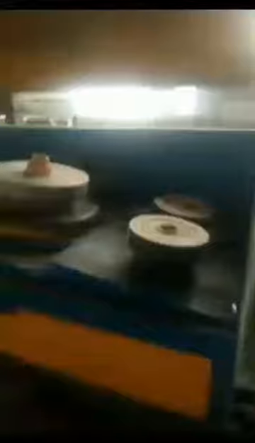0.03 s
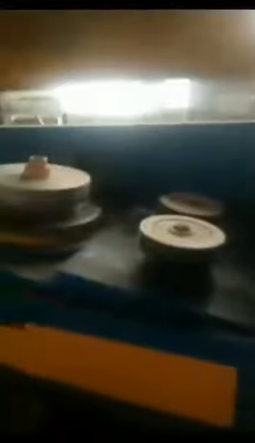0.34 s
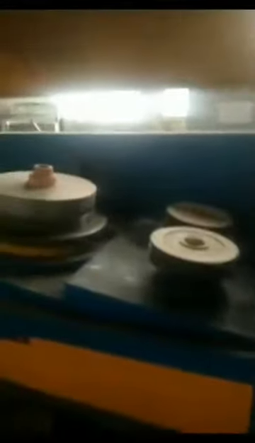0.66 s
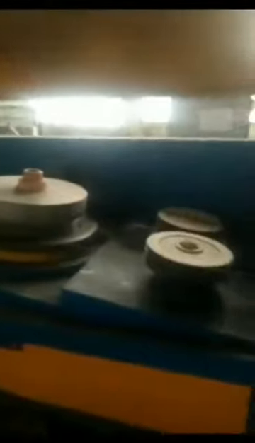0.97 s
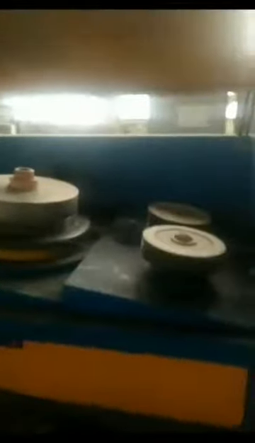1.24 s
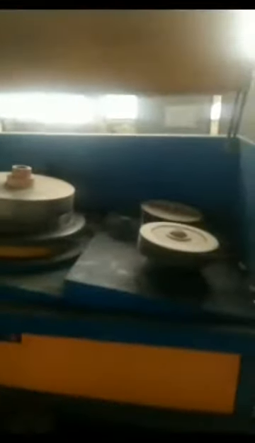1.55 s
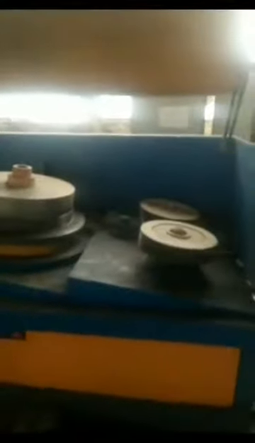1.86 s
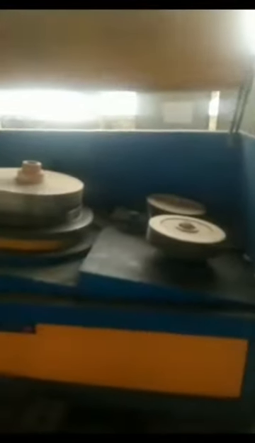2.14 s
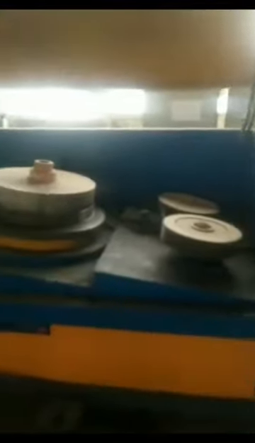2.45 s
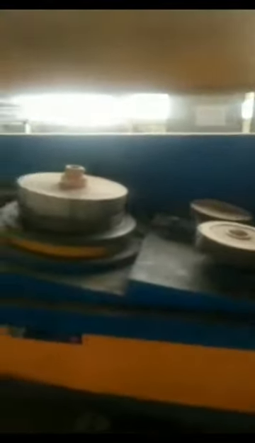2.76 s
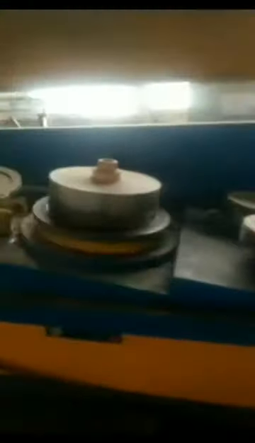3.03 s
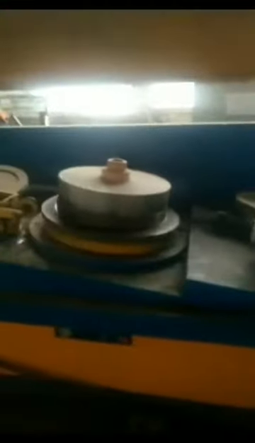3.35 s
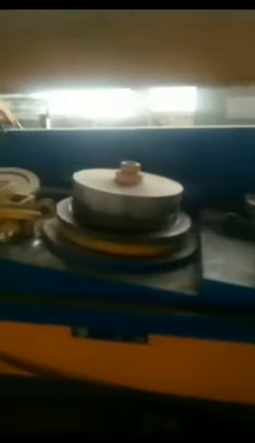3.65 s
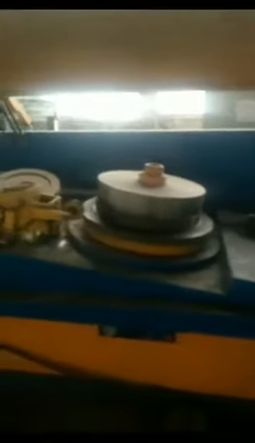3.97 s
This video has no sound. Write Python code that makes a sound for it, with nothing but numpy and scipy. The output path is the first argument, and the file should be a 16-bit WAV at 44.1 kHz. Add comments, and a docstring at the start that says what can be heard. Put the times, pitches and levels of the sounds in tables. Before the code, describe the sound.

An industrial machine roars and hums continuously, with rasping hiss and thin high squeaks.

```python
"""A throbbing hum and a roar fade in quickly: a wire drawing machine runs steadily in a workshop.
Its drives hum at close pitches and beat against each other over the broadband noise of drums and gears.
Sliding friction makes the wire hiss and rasp unevenly through the die and over the capstan.
The rubbing also excites a thin high whine, which stick-slip motion turns into brief rough squeaks.
Now and then a metal part rings within the roar."""
import sys
import numpy as np
from scipy import signal
from scipy.fft import rfft, irfft
from scipy.io import wavfile
from scipy.ndimage import uniform_filter1d

SR = 44100
rng = np.random.default_rng(int(sys.argv[2]) if len(sys.argv) > 2 else 0)


def digitize_waveform(pressure):
    """Quantize a signal to 16-bit integers and store it at the path in sys.argv[1].

    Rows of a 2-D input are taken as channels; values are limited to [-1, 1].
    """
    field = np.atleast_2d(pressure).T
    bounded = np.clip(field, -1, 1)
    quanta = np.round(bounded * 32767).astype(np.int16)
    wavfile.write(sys.argv[1], SR, quanta)


N = 176400
T = np.arange(N) / SR

# Close tones of the drives: pitch_hz
DRIVE_PITCHES = [157.62, 159.71, 162.58, 172.71]
# Their strengths (all levels are relative): level_db
DRIVE_LEVELS = [-34, -38, -41.5, -33.5]
# Weaker tones of motors and gears: pitch_hz, level_db
MOTOR_TONES = [(49.0, -53.5), (98.25, -42.5), (247.8, -46), (270.09, -48), (337.8, -48), (432.56, -47.5),
               (659.1, -45.5), (1201, -55)]
# Slow rise of the hum: time_s, gain_db
HUM_ENVELOPE = [(.3, -5), (1.2, -2.5), (2.2, -1), (4, -0.5)]
# Brief surges of the throb: peak_s, gain_db
THROB_SURGES = [(.865, 1), (1.655, 2.5), (2.21, 2.5), (2.82, 3), (3.21, 2.5), (3.63, 1.7)]
# Noise of drums and gears: frequency_hz, density_db
ROAR_SPECTRUM = [(20, -22), (36, -25), (47, -2), (62, 0.2), (80, -2), (120, -2), (152, 2), (178, 1),
                 (198, -0.4), (222, 2.5), (310, -1.5), (460, -3.5), (560, -1.5), (660, 1), (710, -2),
                 (780, .5), (890, -3.5), (1000, -3), (1110, -7), (1200, -5.5), (1270, -7.5), (1370, -6.5),
                 (1750, -14), (3000, -18.5), (8000, -45)]
# Share of the hum's envelope that the roar follows: frequency_hz, share
HUM_COUPLING = [(60, 0.75), (250, 0.24), (800, 0.039)]
# Swell of the roar's low body: time_s, gain_db
BODY_ENVELOPE = [(.3, 2), (.55, 0), (.85, 3), (.94, -2), (1.05, 3), (1.38, 2), (1.47, -4.5), (1.6, 0),
                 (2, -0.5), (2.2, 0.5), (2.5, -5), (2.6, 1.5), (3, 0), (3.25, 0), (3.45, 0.5), (3.9, 1.5)]
# Swell of the roar's middle: time_s, gain_db
MIDDLE_ENVELOPE = [(.3, -0.5), (.45, -1), (.67, 1), (.95, -2), (1.1, 2.5), (1.2, 0.5), (1.4, -0.5),
                   (1.78, -2.5), (1.95, -0.5), (2.2, -.5), (2.4, -0.5), (2.7, -1.5), (3.1, 1.5), (3.35, -1),
                   (3.5, 0.5), (4, .3)]
# Friction noise of the sliding wire: frequency_hz, density_db
HISS_SPECTRUM = [(600, -16), (1800, -2.5), (2800, 1.65), (3350, -4.5), (4600, -4), (4950, -1.5),
                 (6000, -2.2), (6900, -1.5), (7700, 2.5), (8050, 0), (8400, -0.5), (8800, -3.5), (9700, -4),
                 (11000, -6.5), (12200, -6), (14200, -10)]
# How hard the wire rubs: time_s, gain_db
RUB_ENVELOPE = [(.28, -2.5), (.57, -6.5), (.73, 2), (.93, -2.5), (1.1, -1), (1.47, 2), (1.57, -3.5),
                (1.7, -0.5), (1.8, -1), (1.95, 3), (2.08, 1.5), (2.19, 5), (2.29, 0.5), (2.45, 0),
                (2.68, 0.5), (2.85, 1), (3.03, 2), (3.3, 3), (3.78, 1.5), (4, 2.5)]
# Response of the hiss to the rubbing: frequency_hz, factor
RUB_COUPLING = [(2000, 0.42), (6000, 0.82), (13000, 1.17)]
# Swell of the low rasp: time_s, gain_db
LOW_RASP_ENVELOPE = [(.3, -6), (.6, -3.5), (.85, -2), (1.15, -7), (1.6, -3.5), (2, 0), (2.18, 4), (2.45, 1),
                     (2.6, 2.5), (2.72, 2), (2.8, -0.5), (3.05, 0.5), (3.15, 0.5), (3.38, 1), (3.72, -3),
                     (3.86, 4), (3.94, -1)]
# Swell of the high rasp: time_s, gain_db
HIGH_RASP_ENVELOPE = [(.28, -4.5), (.4, -1.5), (.57, -5), (.72, 2.5), (.85, -3.5), (1.25, -5), (1.38, .5),
                      (1.55, -2.5), (1.6, 2.5), (1.75, -1), (2.12, 1.5), (2.19, 5), (2.26, 0.5), (2.42, -4),
                      (2.55, 2), (2.65, -1), (2.78, -1), (2.83, 3), (3.2, 1), (3.3, -3), (3.4, -1.5),
                      (3.55, -1.5), (4, -2.5)]
# Resonances of the rubbed wire: pitch_hz, width_hz, level_db, left_minus_right_db
WIRE_MODES = [(3820, 45, -55, 4), (8400, 200, -53, -6), (10070, 230, -43.5, -9), (10400, 190, -49.5, -8)]
# Flares of the whine: peak_s, half_length_s, level_db
SQUEAKS = [(0.306, 0.053, -45), (0.74, 0.033, -40), (1.87, 0.025, -35), (1.985, 0.063, -37),
           (2.155, 0.045, -32), (2.362, 0.041, -35), (2.707, 0.071, -31.5), (3.019, 0.024, -30.5),
           (3.3, 0.019, -32.5), (3.36, 0.065, -34.5), (3.662, 0.028, -27), (3.89, 0.06, -36)]
# Ringing metal parts: peak_s, half_length_s, pitch_hz, level_db
METAL_RINGS = [(0.692, 0.1, 770, -37.5), (1.462, .03, 740, -35), (1.68, .035, 640, -34),
               (2.44, .1, 659, -37.5), (2.683, .07, 659, -36.5), (2.766, .06, 1060, -38.5),
               (3.298, 0.049, 771, -34)]
# Likeness of left and right in roar and hiss: frequency_hz, correlation
STEREO_CORRELATION = [(60, 0.95), (170, 0.98), (270, 0.92), (440, 0.74), (720, 0.58), (1180, 0.05),
                      (1900, 0.02)]
# Balance of roar and hiss: frequency_hz, left_minus_right_db
STEREO_BALANCE = [(60, 2.8), (210, 1.3), (380, 3.5), (750, 1), (1130, 1), (1800, -3.5), (2600, -2.5),
                  (3200, -1), (4100, 0), (5000, 3.5), (6000, 1), (6900, -2), (7650, -5.5), (8400, -9),
                  (9000, -6), (12000, -5), (14000, -1.5)]
# Fade-in, whose last gain holds to the end: time_s, gain_db
FADE_IN = [(.1, -70), (.13, -41), (.17, -18.5), (.23, -7.5), (.27, 1), (.3, 2.5)]


def drive_hum(in_step_s=3.641, drift_share=0.00023, surge_s=0.041):
    """Superposed tones of close pitch beat at their difference frequencies; phases align near in_step_s."""
    hum, start_turns = np.zeros(N), rng.random()
    for hz, db in list(zip(DRIVE_PITCHES, DRIVE_LEVELS)) + MOTOR_TONES:
        drift_s = drift_share * np.cumsum(wander(rate_hz=7.1)) / SR
        turns = hz * (T - in_step_s + drift_s) + start_turns
        gain = amp(db + 0.23 * wander(rate_hz=8.2))
        hum += gain * np.sqrt(2) * np.cos(2 * np.pi * turns)
    surges_db = sum(db * np.exp(-((T - peak_s) / surge_s) ** 2) for peak_s, db in THROB_SURGES)
    return hum * amp(curve(HUM_ENVELOPE) + surges_db) * pan(left_db=2.36)


def drum_roar(level_db=-29.5, flicker_db=0.74):
    """Irregular vibration of drums and gears radiates broadband noise, spread by the workshop."""
    def swell_db(t, hz):
        """The bass follows the hum; body and middle are modulated independently."""
        bass = curve(HUM_ENVELOPE, t) * spectrum_at(HUM_COUPLING, hz)
        body = curve(BODY_ENVELOPE, t) * band(hz, centre_hz=284)
        middle = curve(MIDDLE_ENVELOPE, t) * band(hz, centre_hz=685)
        return bass + body + middle
    roar = shaped_noise(ROAR_SPECTRUM, swell_db, patch_db=0.86, ring_db=2.5, size=1024)
    return amp(level_db) * evened(roar * amp(flicker_db * wander(rate_hz=41)))


def wire_hiss(level_db=-32.5, flutter_hz=22.35, flutter_db=1, surge_db=0.83):
    """Sliding friction makes noise, amplitude-modulated as the wire shakes."""
    def rub_db(t, hz):
        """Harder rubbing raises the treble most."""
        return curve(RUB_ENVELOPE, t) * spectrum_at(RUB_COUPLING, hz)
    friction = shaped_noise(HISS_SPECTRUM, rub_db, patch_db=0.44, ring_db=2.5, size=512)
    flutter = flutter_db * np.sin(2 * np.pi * (flutter_hz * T + rng.random()))
    return amp(level_db) * evened(friction * amp(flutter + surge_db * wander(rate_hz=13.5)))


def wire_rasps():
    """Scraping excites two resonances too broad for a clear pitch, each swelling on its own."""
    low = resonance(hz=3930, width_hz=720, level_db=-43, left_db=-1)
    high = resonance(hz=5980, width_hz=1050, level_db=-40, left_db=14)
    return low * amp(curve(LOW_RASP_ENVELOPE)) + high * amp(curve(HIGH_RASP_ENVELOPE))


def wire_whine(waver_db=1.5):
    """Forced vibration: the wire's narrow resonances sound louder the harder it rubs."""
    rub_db = curve(RUB_ENVELOPE)
    return sum(resonance(*mode) * amp(rub_db + waver_db * wander(rate_hz=13)) for mode in WIRE_MODES)


def wire_squeaks(pitch_hz=10100, jitter_hz=45, rough_db=2.5):
    """Stick-slip motion at the wire's main resonance briefly turns the whine into a rough squeak."""
    envelope = sum(amp(db) * pulse(peak_s, half_s) for peak_s, half_s, db in SQUEAKS)
    sides = []
    for side in range(2):
        tone = np.sin(phase(pitch_hz + jitter_hz * wander(rate_hz=186.5)))
        sides.append(evened(tone * amp(rough_db * wander(rate_hz=310))))
    return envelope * np.array(sides) * pan(left_db=-13)


def metal_rings(jitter_hz=18):
    """Resonating metal parts sing out briefly, each at a wavering pitch."""
    rings = np.zeros(N)
    for peak_s, half_s, hz, db in METAL_RINGS:
        tone = np.sqrt(2) * np.sin(phase(hz + jitter_hz * wander(rate_hz=40)))
        rings += amp(db) * pulse(peak_s, half_s) * tone
    return rings * pan(left_db=4)


def resonance(hz, width_hz, level_db, left_db):
    """A randomly driven resonance gives a band of noise; its centre wanders by about 0.2 percent."""
    angle = phase(hz * (1 + 0.002188 * wander(rate_hz=9.63)))
    sides = [wander(width_hz / 2) * np.cos(angle) + wander(width_hz / 2) * np.sin(angle)
             for side in range(2)]
    return np.array(sides) * pan(left_db) * amp(level_db)


def shaped_noise(spectrum, envelope_db, patch_db, ring_db, size):
    """Partly correlated stereo noise of rms 1, with brief wide patches and passing narrow resonances."""
    hop = size // 4
    t, hz = np.arange(N // hop + 5) * hop / SR, np.fft.rfftfreq(size, 1 / SR)
    shape = len(t), len(hz)
    gain_db = envelope_db(t[:, None], hz) + patch_db * patches(shape, frames=2, bins=16)
    gain_db += ring_db * patches(shape, frames=12, bins=2)
    real, imaginary = rng.standard_normal((2, 2, *shape))
    spectrogram = ((real + 1j * imaginary) * amp(gain_db)).transpose(0, 2, 1)
    _, noises = signal.istft(spectrogram, nperseg=size, noverlap=size - hop)
    left, independent = rfft(noises[:, :N])
    f = np.fft.rfftfreq(N, 1 / SR)
    correlation = spectrum_at(STEREO_CORRELATION, f)
    right = correlation * left + np.sqrt(1 - correlation ** 2) * independent
    colour = amp(spectrum_at(spectrum, f)) * pan(spectrum_at(STEREO_BALANCE, f))
    return evened(irfft(np.array([left, right]) * colour, N))


def patches(shape, frames, bins):
    """Moving averages smooth noise into time-frequency patches of rms 1."""
    smooth_in_time = uniform_filter1d(rng.standard_normal(shape), frames, axis=0)
    return evened(uniform_filter1d(smooth_in_time, bins, axis=1))


def wander(rate_hz):
    """Low-pass noise of rms 1 fluctuates at up to about rate_hz."""
    f = np.fft.rfftfreq(N, 1 / SR)
    low_pass = (f > 0) * np.exp(-(f / rate_hz) ** 2)
    return evened(irfft(rfft(rng.standard_normal(N)) * low_pass, N))


def phase(hz):
    """Phase in radians is the time integral of angular frequency."""
    return 2 * np.pi * np.cumsum(hz) / SR


def pulse(peak_s, half_s):
    """Gaussian envelope, 17 dB down at half_s either side of its peak."""
    return np.exp(-2 * ((T - peak_s) / half_s) ** 2)


def band(hz, centre_hz, octaves=0.5):
    """Gaussian weight on a log-frequency axis."""
    return np.exp(-(np.log2((hz + 1) / centre_hz) / octaves) ** 2)


def curve(points, t=T):
    """Linear interpolation over time."""
    return np.interp(t, *np.transpose(points))


def spectrum_at(points, hz):
    """Interpolation over log frequency."""
    f, value = np.transpose(points)
    return np.interp(np.log(hz + 1), np.log(f + 1), value)


def pan(left_db):
    """Constant-power gains for a level difference of left minus right."""
    gains = amp(np.array([left_db, -left_db]).reshape(2, -1) / 2)
    return gains / np.sqrt((gains ** 2).mean(0))


def amp(db):
    """Decibels to amplitude ratio."""
    return 10 ** (np.asarray(db) / 20)


def evened(x):
    """Normalisation to rms 1."""
    return x / np.sqrt(np.mean(x ** 2) + 1e-20)


def scene():
    """Superposition: the sound pressures of the machine's parts add."""
    return (drive_hum() + drum_roar() + wire_hiss() + wire_rasps()
            + wire_whine() + wire_squeaks() + metal_rings())


def record(dry):
    """A gain ramp fades the sound in from silence; a low-pass filter limits its bandwidth."""
    faded = dry * amp(curve(FADE_IN)) * (T > FADE_IN[0][0])
    low_pass = signal.firwin(511, cutoff=14300, window=("kaiser", 9), fs=SR)
    return signal.oaconvolve(faded, low_pass[None], "same")


dry = scene()
out = record(dry)
digitize_waveform(out)
```